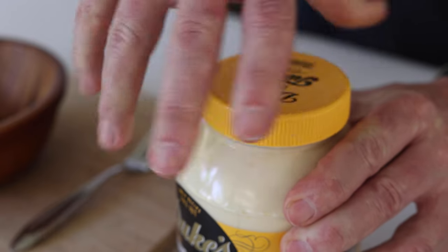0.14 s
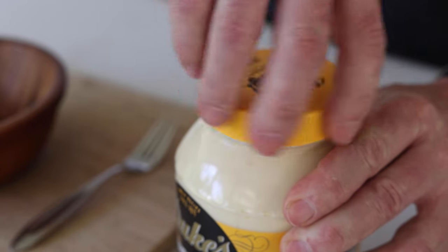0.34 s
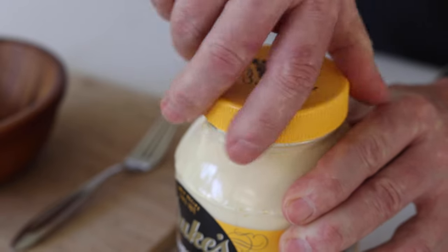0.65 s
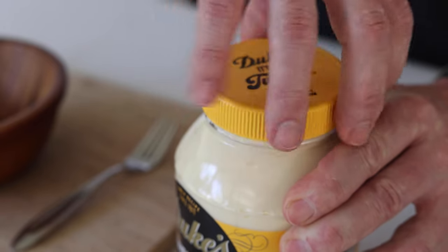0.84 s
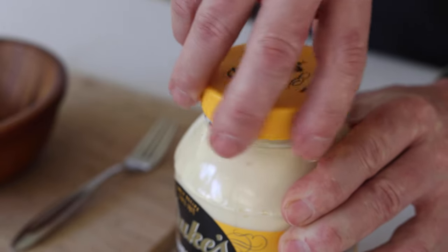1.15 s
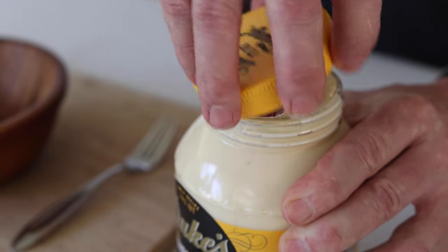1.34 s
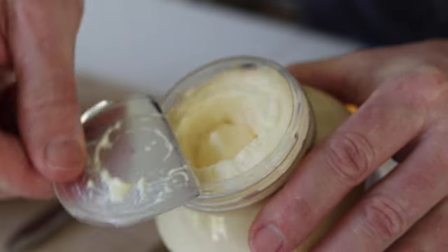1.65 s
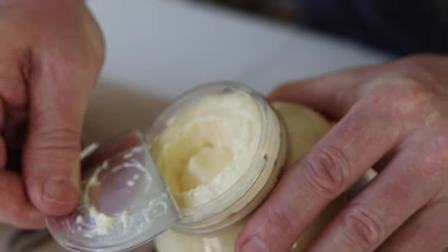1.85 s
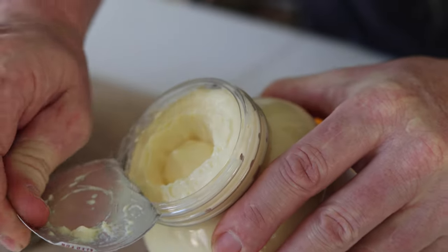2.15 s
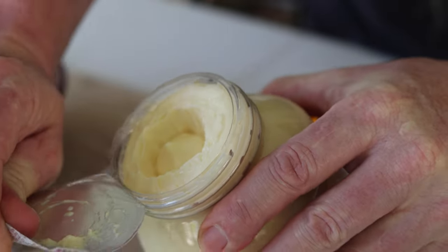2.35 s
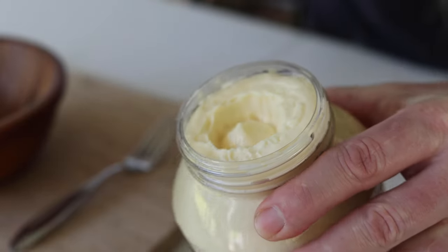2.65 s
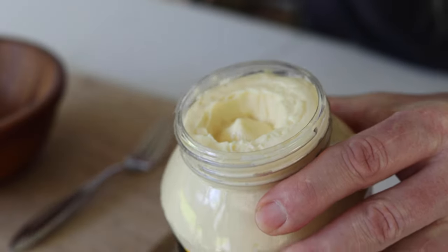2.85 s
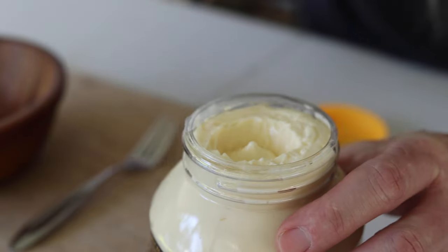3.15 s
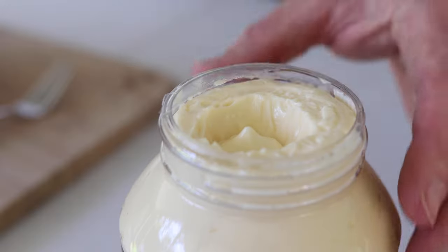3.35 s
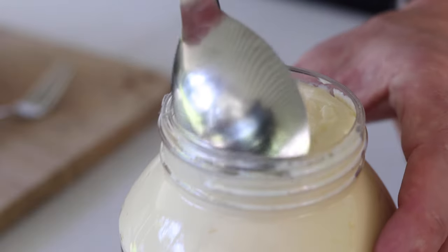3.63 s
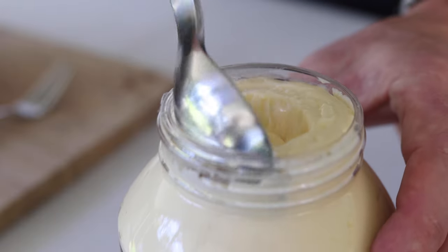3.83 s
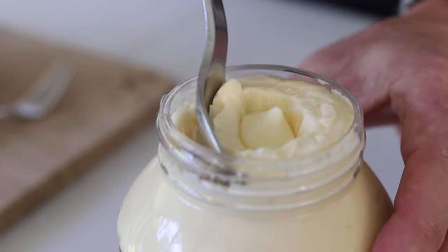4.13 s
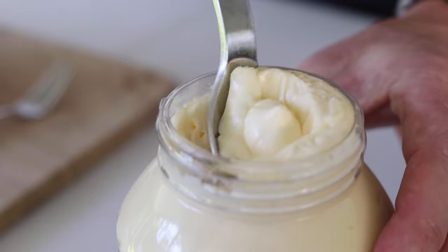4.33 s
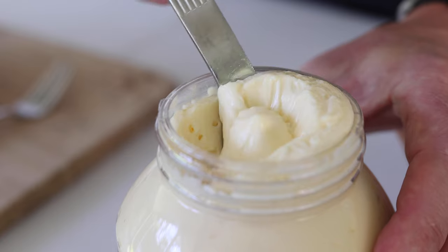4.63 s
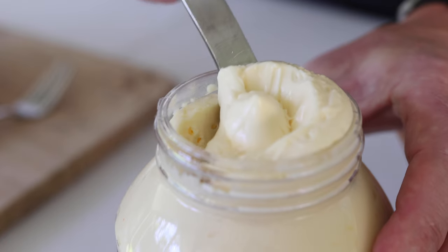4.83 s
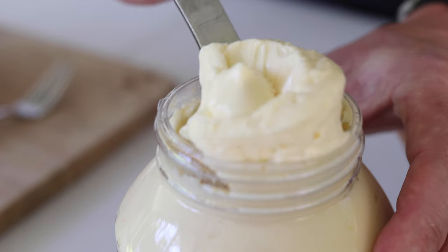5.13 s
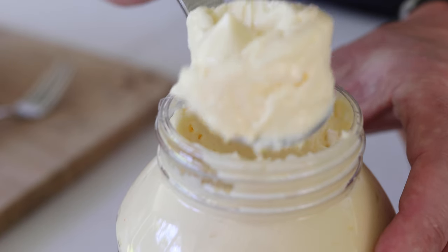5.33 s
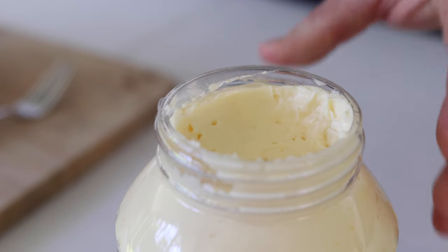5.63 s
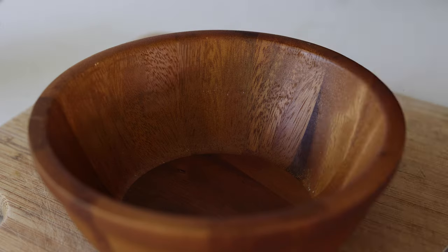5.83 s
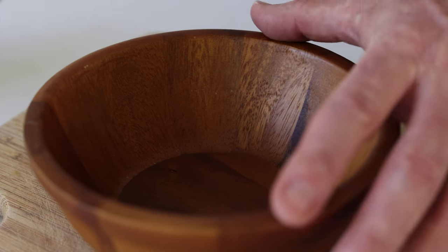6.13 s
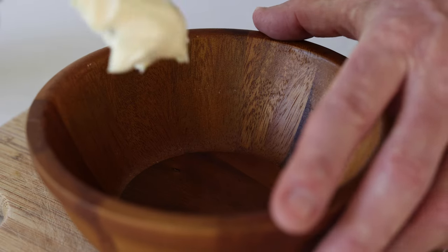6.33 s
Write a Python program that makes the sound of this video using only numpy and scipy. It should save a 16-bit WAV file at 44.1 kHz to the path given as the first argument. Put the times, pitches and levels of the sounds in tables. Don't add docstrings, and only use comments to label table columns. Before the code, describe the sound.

A close, nearly mono kitchen scene with a short room reverberation, low rumble, soft hiss and distant traffic hum. From 0.1 s a ribbed plastic lid turns in short bursts, hollow clicks and gritty rubs at about 0.1, 0.35, 0.87 and 1.34, with a rising cluster of cracks near 1.45 as it comes free. The background changes abruptly at 1.49. Foil glue crackles rapidly from 2.0 to 2.1, with a light sliding hiss, then a sharp pop at 2.47. The jar bumps wood softly at 1.95 and 2.2, firmly at 2.66, then lands with the loudest thud at 3.11, rattling until 3.2. Spoon taps come around 3.6, with three faint, thin bird chirps from 3.66 to 3.85. Bright steel squeaks and scrapes glide from 3.95 to 4.26. Scooping is quiet, with a small dull squeak at 4.88 and a tap at 5.15. Soft low bumps sound at 6.2 and 6.34.

```python
import sys
import numpy as np
from scipy import signal
from scipy.fft import rfft, irfft, next_fast_len
from scipy.io import wavfile
from scipy.ndimage import uniform_filter1d, map_coordinates

SR = 44100
rng = np.random.default_rng(int(sys.argv[2]) if len(sys.argv) > 2 else 0)


def volts_from_db(level):
    exponent = np.asarray(level, float) / 20
    return 10 ** exponent


def transcribe(u):
    v = np.clip(np.atleast_2d(u).T, -1, 1)
    q = np.round(v * 32767).astype(np.int16)
    wavfile.write(sys.argv[1], SR, q)


N = 285768
CUT_S, SINK_S = 1.487, 4.6


def unit(x):
    return x / np.sqrt(np.mean(x ** 2) + 1e-20)


def along(points, hz):
    f, v = np.transpose(points)
    return np.interp(np.log(hz + 1), np.log(f + 1), v)


def curves(table, s):
    at, *cols = np.transpose(table)
    return [np.interp(s, at, c) for c in cols]


def wobble(count, size=N):
    knots = rng.standard_normal(int(size * count / SR) + 4)
    return map_coordinates(knots, [np.arange(size) * count / SR])


def filtered(x, response):
    m = next_fast_len(N + SR // 2)
    return irfft(rfft(x, m) * response(np.fft.rfftfreq(m, 1 / SR)), m)[..., :N]


def resonant(x, peaks):
    def response(f):
        total = 0
        for k, (centre, width, db) in enumerate(peaks):
            damping = 1j * f * width
            total = total + (-1) ** k * volts_from_db(db) * damping / (centre * centre - f * f + damping)
        return total
    return filtered(x, response)


def dulled(x):
    return filtered(x, lambda hz: 1 / (1 + (hz / 12700) ** 30))


def add(track, s, sound):
    track[round(s * SR):][:len(sound)] += sound


def rush(spectrum, patchy_db):
    z = signal.stft(rng.standard_normal(N), nperseg=512)[2]
    field = uniform_filter1d(rng.standard_normal(z.shape), size=5, axis=0)
    field = uniform_filter1d(field, size=8, axis=1)
    patched = signal.istft(z * volts_from_db(patchy_db * unit(field)), nperseg=512)[1][:N]
    return unit(filtered(patched, lambda hz: volts_from_db(along(spectrum, hz))))


# f/Hz, level/dB [dB per Hz]
EARLY_RUMBLE = [(15, -65), (25, -35), (32, -37), (61, -5.5), (146, -2), (232, -15.5), (400, -12.5),
                (520, -29), (880, -120)]
RUMBLE = [(15, -33.5), (25, -20.5), (43, -4.5), (97, 0.5), (182, -3), (286, -12), (400, -9), (520, -58.5),
          (880, -120)]
DRONE = [(150, -35), (250, -6), (292, -13.5), (476, -5), (631, -8.5), (714, -3), (1040, -0.5), (1780, -8.5),
         (2460, -18.5), (3000, -20.5), (3900, -26), (6600, -120)]
HISS = [(1500, -120), (2200, -3.5), (4000, -4), (7000, -6.5), (9600, -6.5), (10000, -19), (13000, -18.5),
        (15800, -20)]
# f/Hz, level/dB [over the rumble]
EARLY_HUM = [(101, 1), (146, -1)]
# f/Hz, level/dB
WHINE = [(1050, -91), (1588, -73)]
# start t/s, rumble level/dB, drone change level/dB
SHOTS = [
    (0, -65, 2),
    (1.487, -68, -1.5),
    (2.5, -65, -1),
    (3.29, -67.5, -0.5),
    (5.87, -67, -6),
]
# t/s, drone level/dB
TRAFFIC = [(0, -63), (.8, -68), (1.8, -60), (3.4, -57.5), (4.3, -57.5), (4.7, -59), (5.0, -58.5),
           (5.8, -59), (6.48, -57.5)]


def air():
    t = np.arange(N) / SR

    def tone(hz, db, level_rate, phase_depth, phase_rate, sway_db):
        level = volts_from_db(db + sway_db * wobble(level_rate))
        return level * np.sin(2 * np.pi * hz * t + phase_depth * wobble(phase_rate))

    start_s, *shot_db = np.transpose(SHOTS)
    rumble_db, change_db = np.array(shot_db)[:, np.searchsorted(start_s[1:], t)]
    rumble_db = rumble_db + 0.8 * wobble(count=3)
    drone_db = change_db + curves(TRAFFIC, t)[0]
    early = rush(EARLY_RUMBLE, patchy_db=0.3) + sum(tone(hz, db, 6, 1, 9, 2.5) for hz, db in EARLY_HUM)
    rumble = volts_from_db(rumble_db + 2.5) * np.where(t < CUT_S, early, rush(RUMBLE, patchy_db=1.5))
    drone = volts_from_db(drone_db + 1.0) * rush(DRONE, patchy_db=1.5)
    hiss = volts_from_db(-71.0) * rush(HISS, patchy_db=0.9)
    whine = sum(tone(hz, db + 2.0, 15, 2.0, 12, 1.7) for hz, db in WHINE) * (t > 1.49) * (t < 2.47)
    electrical = volts_from_db(-85.5) * np.sin(2 * np.pi * 3040 * t)
    return rumble + drone + hiss + whine + electrical


# f/Hz, width/Hz, level/dB
RIM = [(2920, 840, -5.5), (4640, 1300, -0.5), (6650, 1960, 0.5), (7700, 2240, -0.5), (11400, 1800, -7)]
# f/Hz, width/Hz, level/dB
THREAD = [(600, 340, 1), (1114, 190, 0.5), (1567, 460, -7), (2115, 210, -9)]
# peak t/s, rise t/s, release t/s, hiss level/dB,
# grind level/dB
STROKES = [(.1, 0.58, 0.29, -54.5, -70), (0.105, 0.006, 0.024, -35, -36), (.354, 0.0088, 0.034, -75, -36),
           (0.411, 0.08, 0.3, -55.5, -47), (.708, 0.066, 0.087, -78, -68), (.85, 0.55, 0.056, -59, -52),
           (.862, 0.019, 0.033, -55, -48), (0.899, 0.033, 0.07, -45.5, -37), (1.33, 0.44, .02, -57, -55),
           (1.336, 0.011, 0.053, -44, -36.5), (1.449, 0.13, 0.031, -49, -45.5),
           (1.467, 0.03, 0.01, -61, -34), (1.99, 0.013, 0.028, -56, -45), (2.012, 0.02, 0.22, -39.5, -42),
           (2.188, 0.012, .06, -47.5, -61), (2.368, 0.059, 0.073, -56, -47.5),
           (2.462, 0.021, .003, -42, -40), (3.19, 0.4, 0.098, -47, -72), (3.512, 0.087, 0.25, -79.5, -63),
           (3.947, 0.083, .003, -44.5, -60), (5.646, 0.089, .046, -57, -64.5)]


def rub():
    t = np.arange(0, N, 8) / SR
    levels = np.zeros((2, len(t)))
    for s, rise, release, hiss_db, grind_db in STROKES:
        away = np.maximum((s - t) / rise, (t - s) / release)
        levels += np.outer(volts_from_db([hiss_db, grind_db]), volts_from_db(-30 * away))
    levels = np.repeat(levels, 8, axis=1)[:, :N]
    hiss, grind = np.roll(levels, SR // 250, axis=1)
    grains = rng.standard_normal((2, N)) * volts_from_db(3.5 * wobble(2500) + 3 * wobble(150))
    rim = unit(resonant(resonant(grains[0], RIM), [(6500, 12000, 0)]))
    hollow = unit(resonant(grains[1], THREAD))
    return volts_from_db(-12.5) * hiss * rim + volts_from_db(-8.0) * grind * hollow


# t/s, peak level/dB, ring f/Hz, crack level/dB [over ring]
TURNS = [(0.1033, -55, 895, 5), (0.109, -44.5, 1350, 14.5), (0.117, -57, 1100, 4), (0.1258, -38, 477, -23),
         (0.13, -42, 630, -23), (0.14, -44, 910, -15), (0.1445, -43, 930, -17), (0.154, -46, 600, -20),
         (0.165, -47, 895, -15), (0.174, -45, 600, -22), (0.327, -45, 780, -17), (0.332, -42, 540, -26),
         (0.3531, -25.5, 880, -13.5), (0.418, -46, 460, -6), (0.4407, -38, 620, -10),
         (0.694, -40, 426, -22), (0.709, -47, 487, -23), (0.842, -59, 400, 13.5), (0.8535, -56, 880, 3),
         (0.8602, -31.5, 1270, -26), (0.8607, -43, 1900, -28), (0.8672, -49, 1500, -22),
         (0.89, -51.5, 470, 5.5), (0.898, -38.5, 1640, -12), (0.901, -44, 1140, -8), (0.905, -39, 930, -11),
         (0.914, -49, 600, -25), (1.114, -52, 320, -25), (1.304, -38.5, 1030, -30),
         (1.336, -28.5, 1000, -7.5), (1.414, -44, 1410, -18), (1.4205, -45, 1320, -14),
         (1.437, -48, 1390, -12), (1.445, -44, 1840, 0.5), (1.449, -26, 1500, -19), (1.456, -40, 1590, -2),
         (1.4603, -34.5, 1670, -5.5), (1.4636, -33, 1760, -20), (1.467, -35, 2010, -8.5),
         (1.4745, -42, 2070, -23)]
# t/s, peak level/dB, ring f/Hz, crack level/dB [over
# ring], crack f/Hz
TAPS = [(1.626, -59, 894, 10, 4400), (2.4568, -53, 1540, 4, 6500), (2.461, -35, 834, -6.5, 3250),
        (2.4785, -35, 600, 0, 8300), (2.4835, -37, 560, -14, 3000), (2.4755, -38, 785, -1.5, 8600),
        (2.4945, -42, 600, -1, 8300), (3.554, -53, 1030, -4.5, 4080), (3.616, -59, 1170, 2.5, 3700),
        (3.653, -37.5, 460, -19, 3070), (3.669, -33.5, 383, -28, 3040), (4.6, -52, 830, -12, 3390),
        (5.1535, -44, 700, -16, 3060), (5.511, -56, 1700, -14, 3140),
        (3.909, -67, 1010, 8, 5530), (4.399, -60, 1000, 4, 8000), (4.941, -53, 1010, 9, 7300),
         (4.95, -52, 990, 1, 10300), (5.036, -46.5, 1070, -5.5, 3760), (6.188, -38.5, 335, -40, 3000),
         (6.213, -33.5, 410, -40, 3000), (6.2183, -34, 300, -35, 3000), (6.339, -40, 250, -39, 3000)]


def lid():
    ring, crack, t = np.zeros(N + SR), np.zeros(N + SR), np.arange(SR // 10) / SR
    free_s = 1.4
    contacts = TAPS
    for row in TURNS:
        threaded_hz = 6600 if row[3] > -10 else 3400
        contacts = contacts + [row + (4050 if row[0] > free_s else threaded_hz,)]
    for s, db, hz, crack_db, crack_hz in contacts:
        t60 = 0.013 * volts_from_db(-0.22 * (db + 40))
        soft = volts_from_db(-0.45 * crack_db)
        rise = 1 - np.exp(-t / (0.00017 * soft))
        pair = np.sin(2 * np.pi * hz * t) + 0.1 * np.sin(2 * np.pi * 1.83 * hz * t)
        grit = 0.75 / max(soft, 1) * rng.standard_normal(len(t))
        add(ring, s + 0.000885, -volts_from_db(db + 5.0 - 60 * t / t60) * rise * (pair + grit))
        loose = free_s < s < CUT_S
        snap = (0.4 if loose or s > SINK_S else 1) * rng.standard_normal(len(t))
        snap += 1.24 * np.sin(2 * np.pi * crack_hz * t)
        snap += 1.1 * loose * np.sin(2 * np.pi * 1.5 * crack_hz * t)
        add(crack, s + 0.00082, volts_from_db(db + crack_db + 8.0 - 60 * t / 0.0054) * snap)

    def cavity(hz):
        low_cut = 1j * hz / (1j * hz + 250)
        return low_cut / (1 + 1j * hz / 2600 - (hz / 2300) ** 2) ** 2

    crack = resonant(resonant(crack[:N], RIM), [(6470, 30000, 0)])
    return filtered(ring[:N], cavity) + np.where(np.arange(N) > SR // 5, dulled(crack), crack)


# f/Hz, t60 t/s
KITCHEN = [(100, 0.46), (600, 0.17), (3000, 0.27), (8000, 0.17), (15000, 0.13)]


def kitchen(x):
    hz, t, z = signal.stft(rng.standard_normal(SR // 2), SR, nperseg=256)
    tail = signal.istft(z * volts_from_db(-60 * t / along(KITCHEN, hz)[:, None]), SR, nperseg=256)[1]
    return signal.fftconvolve(np.pad(x, (180, 0)), tail / np.linalg.norm(tail))[:N]


# t/s, peak level/dB, edge level/dB
KNOCKS = [
    (1.949, -25, -22),
    (2.205, -30, -15.5),
    (2.663, -20.5, -20.5),
    (2.865, -35.5, -22),
]
# t/s, peak level/dB, edge level/dB, sign of first push [+1 or -1]
ROCKS = [
    (3.109, -11.5, -11.5, 1),
    (3.1367, -13.5, -14, -1),
    (3.1386, -19, -30, -1),
    (3.153, -23.5, -11, 1),
    (3.1675, -20, -17, -1),
    (3.179, -21.5, -16, 1),
    (3.198, -23.5, -26, 1),
]
# f/Hz, level/dB, t60 t/s
BOARD = [(74, 14.5, 0.17), (128, 22.5, 0.058), (216, 24.5, 0.022), (348, -30, 0.06), (475, 17, 0.054),
         (680, -32, 0.071)]
# delay t/s, signed gain [ratio]
BOUNCE = [(.0046, 0.072), (.0086, 0.29), (0.011, .3), (0.0199, 0.91)]
# f/Hz, width/Hz, level/dB
BASE = [(900, 480, 7), (1445, 350, 3), (3400, 700, -1.5), (5600, 1060, -3.5), (7400, 1360, -14.5)]


def jar():
    (track, base, thud), t = np.zeros((3, N + SR)), np.arange(SR // 3) / SR

    def bump(at, width):
        return np.exp(-0.5 * ((t - at) / width) ** 2)

    push = bump(0.003, 0.00052) - 1.05 * bump(0.00135, 0.00029)
    knocks = [k + (1, BOUNCE) for k in KNOCKS]
    rocks = [k + (BOUNCE[:-1],) for k in ROCKS]
    for s, db, edge_db, sign, returns in knocks + rocks:
        body = push.copy()
        for delay, gain in returns:
            body += gain * np.pad(push, (round(delay * SR), 0))[:len(t)]
        modes = 0
        for hz, mode_db, t60 in BOARD:
            decay = volts_from_db(mode_db + 2 * rng.standard_normal() - 60 * t / t60)
            modes = modes + decay * np.sin(2 * np.pi * hz * t)
        add(track, s, sign * volts_from_db(db - 4.5) * (body + 0.056 * modes * (1 - bump(0, 0.0028))))
        add(thud, s + 0.00102, volts_from_db(db + 2 - 60 * t / 0.13) * rng.standard_normal(len(t)))
        rattle = rng.standard_normal(len(t)) + 0.32 * np.sin(2 * np.pi * 3280 * t)
        add(base, s + 0.00097, volts_from_db(db + edge_db + 7.5 - 60 * t / 0.017) * rattle)
    thud = resonant(resonant(thud[:N], [(408, 484, 0)]), [(400, 500, 0)])
    base = dulled(resonant(resonant(base[:N], BASE), [(2200, 1850, 0.014)]))
    return track[:N] + thud + base


# t/s, peak level/dB, f/Hz, jar mouth level/dB
SNAPS = [(2.0, -45, 5230, -22), (2.008, -32.5, 5200, -20), (2.016, -33.5, 6940, -18),
         (2.035, -36, 5340, -12), (2.0435, -44, 5300, -14), (2.0554, -33.5, 4700, -14),
         (2.0112, -23.5, 5300, -12), (2.0213, -23, 5420, -13), (2.031, -31, 5200, -9),
         (2.04, -35, 5140, -9), (2.048, -30.5, 7950, -7), (2.0586, -37, 5830, -9),
         (2.0724, -37.5, 4400, -9), (2.0795, -35.5, 3560, -17), (2.0904, -46, 7700, -14),
         (2.188, -43, 5700, -21.5), (2.364, -49, 3200, -4)]
# f/Hz, width/Hz, level/dB
FOIL = [(1410, 260, 3.5), (3000, 240, 4), (5230, 1600, 0), (8000, 2500, -1.5), (11560, 2100, -3)]


def foil():
    track, t = np.zeros(N + SR), np.arange(SR // 20) / SR
    for s, db, hz, mouth_db in SNAPS:
        burst = np.sign(rng.standard_normal(len(t))) + 0.7 * np.sin(2 * np.pi * hz * t)
        mouth_hz = 1450 * (1 + 0.1 * rng.standard_normal())
        mouth = volts_from_db(min(mouth_db, -9) + 3 - 60 * t / 0.022) * np.sin(2 * np.pi * mouth_hz * t)
        add(track, s, volts_from_db(db - 2.5) * (volts_from_db(-60 * t / 0.015) * burst + mouth))
    return resonant(resonant(track[:N], FOIL), [(6500, 16000, 1)])


# f/Hz, level/dB, t60 t/s
POP = [(503, -18, .02), (700, 1, 0.012), (1390, -3, 0.01), (2670, -3.5, .006), (4440, -12, .004),
       (6650, 1, 0.0048), (8070, 2, .007), (7100, 7, 0.0047), (8600, -9, .008), (11200, -5, 0.0059),
       (12800, -8, 0.0037), (14500, -18, .005)]


def pop():
    track, t = np.zeros(N + SR), np.arange(SR // 20) / SR
    ring = sum(volts_from_db(db - 60 * t / t60) * np.sin(2 * np.pi * hz * t) for hz, db, t60 in POP)
    rise = 1 - np.exp(-t / 0.00057)
    add(track, 2.4686, -volts_from_db(-14) * rise * ring)
    return track[:N]


# t/s, level/dB
CHIRPS = [
    (3.66, -70.5),
    (3.73, -69.5),
    (3.818, -64.5),
]


def bird():
    long_s, start_hz, rise_hz = 0.042, 8000, 750
    track, t = np.zeros(N + SR), np.arange(round(long_s * SR)) / SR
    glide = np.sin(2 * np.pi * (start_hz + rise_hz * t / long_s / 2) * t)
    note = np.sin(np.pi * t / long_s) * glide
    for s, db in CHIRPS:
        add(track, s, volts_from_db(db + 3.8 * wobble(count=150, size=len(t))) * note)
    return track[:N]


# t/s, slip rate f/Hz, pressure level/dB, roughness [0-1]
NICK = [(3.9505, 5000, -41, 0.26), (3.9517, 4400, -34, .3), (3.9535, 3600, -46, 0.27)]
BITE = [(3.96, 4850, -45.5, .1), (3.962, 4520, -33.5, 0.14), (3.965, 3600, -31.5, .05),
        (3.966, 3330, -46, 0.3), (3.969, 2900, -29.5, .2)]
SKID = [(3.969, 4880, -26.5, .05), (3.971, 4640, -31, 0.059), (3.974, 4010, -35.5, 0.16),
        (3.979, 2760, -26.5, .3), (3.982, 2990, -31, 0.32), (3.985, 4020, -31, .12),
        (3.988, 4680, -37.5, .04), (3.99, 3970, -34.5, 0.17), (3.996, 2307, -23.5, 0.497)]
DRAG = [(3.998, 1587, -33, 0.5), (4.002, 1120, -30.5, .35), (4.008, 1192, -33, .4), (4.013, 1248, -34, .2),
        (4.017, 1360, -35, 0.3), (4.021, 1452, -35, .12), (4.028, 1515, -31, 0.13),
        (4.031, 1570, -33, 0.22)]
CLIMB = [(4.03, 2340, -28.5, .2), (4.037, 2960, -31.5, .12), (4.037, 3160, -34, .1),
         (4.0395, 3260, -30, .4), (4.0405, 4280, -34.5, .1), (4.045, 4580, -30, .06),
         (4.046, 4950, -34, .1), (4.049, 6000, -30, .2)]
STUTTER = [(4.05, 6070, -34, 0.26), (4.051, 6500, -43, .3), (4.054, 6800, -34.5, .2),
           (4.054, 6650, -53, .2), (4.0548, 6500, -27, .15), (4.056, 6160, -46, .3),
           (4.059, 6200, -35, 0.17), (4.061, 5750, -40, .1)]
HOLD = [(4.061, 5600, -45, .06), (4.066, 5990, -25.5, .04), (4.069, 6450, -33, .06),
        (4.072, 6360, -49, .15), (4.0745, 6500, -27, 0.083), (4.079, 6470, -48, 0.17),
        (4.085, 6500, -55, .3), (4.0875, 6300, -37, 0.22), (4.09, 6300, -54, .4)]
LEAN = [(4.091, 6340, -61, 0.35), (4.127, 6230, -48.5, .5), (4.141, 6200, -40.5, 0.92),
        (4.146, 6000, -38, 0.39), (4.146, 5980, -45.5, .4)]
SHOVE = [(4.148, 4090, -23.5, 0.41), (4.151, 4090, -34, 0.16), (4.155, 3700, -32, .1),
         (4.157, 3830, -31.5, 0.11), (4.161, 3580, -31, 0.074), (4.162, 3390, -21.5, .03),
         (4.166, 3190, -22, 0.034), (4.17, 3040, -21, 0.048), (4.172, 2940, -24.5, 0.14)]
STALL = [(4.172, 2936, -25.5, 0.16), (4.176, 2690, -28, .4), (4.179, 2084, -23.5, 0.85),
         (4.185, 1510, -29, 0.88), (4.191, 1057, -33.5, 0.43), (4.195, 774, -36, 0.64),
         (4.199, 680, -44.5, .7)]
TWIST = [(4.215, 805, -30, 0.33), (4.22, 1051, -30.5, 0.13), (4.223, 1133, -29.5, 0.17),
         (4.229, 1304, -24.5, 0.34)]
FLICK = [(4.229, 2040, -28, 0.33), (4.232, 2470, -27, 0.28), (4.236, 2756, -31.5, .1),
         (4.24, 3200, -24.5, .06), (4.243, 3400, -36.5, .2), (4.252, 3520, -36, 0.21),
         (4.26, 3440, -59, .5)]
SLIP = [(4.32, 3220, -52, 0.2), (4.326, 2560, -56, 0.25)]
SCOOP = [(4.869, 864, -50, .3), (4.871, 917, -40, 0.2), (4.879, 1340, -40.5, 0.22), (4.882, 1410, -46, 0.2),
         (4.884, 1390, -43, .2), (4.885, 1314, -36.5, 0.15), (4.889, 1301, -37.5, 0.1),
         (4.895, 1270, -38, 0.2), (4.9008, 1290, -41, .2)]
LIFT = [(4.9011, 1114, -38.5, 0.25), (4.91, 982, -37.5, 0.2), (4.9125, 1060, -39, .25),
        (4.915, 1050, -55, .5), (4.922, 1045, -64, 0.53), (4.94, 1034, -56, 0.62), (4.956, 1004, -54, .8)]
LOWEST_DB = [-28, -27, -7, 1, -3, 5, 3.5, 5.5, -15.5, -18, -4.5, 4, 2.5, -14, -10.5]
# f/Hz, level/dB [dB per Hz]
SPOON = [(470, -34.5), (800, -22.5), (1850, -15), (2200, -30.5), (3080, -14), (3860, -15.5), (4370, -6.5),
         (6040, -1), (7110, -8.5), (9590, -3), (10900, -20), (14100, -14), (14900, -26.5), (15400, -44.5)]
SUNK = [(350, -51), (600, -9), (1360, 0), (2360, -18), (2520, -16.5), (3410, -9), (4500, -4.5),
        (5300, -4.5), (6400, -9.5), (7300, -12), (8890, 0), (12400, -30), (15800, -36)]
# f/Hz, width/Hz, level/dB
BOWL = [(4540, 250, -13.5), (6220, 240, -7), (8000, 250, -7.5), (9900, 500, -13), (11900, 500, -22),
        (13880, 310, -9.5)]


def spoon():
    track = np.zeros(N + SR)

    def colour(spectrum, hz):
        return volts_from_db(6.5 + along(spectrum, hz))

    strokes = [NICK, BITE, SKID, DRAG, CLIMB, STUTTER, HOLD, LEAN, SHOVE, STALL, TWIST, FLICK, SLIP, SCOOP, LIFT]
    for stroke, lowest_db in zip(strokes, LOWEST_DB):
        s = stroke[0][0]
        n = round((stroke[-1][0] - s) * SR) + 44
        hz, db, rough = curves(stroke, s + np.arange(n) / SR)
        rough = np.clip(rough + 0.02, 0.04, 0.95)
        order = np.arange(1, 0.42 * SR / hz.min())[:, None]
        sway = 0.035 * np.sqrt(rough) * wobble(count=130, size=n)
        tremble = 0.014 * wobble(count=350, size=n) + 0.1 * rough * wobble(count=1200, size=n)
        rate = hz * (1 + sway + tremble)
        spread = 4 * rng.random(order.shape)
        flicker = 5.5 * np.sqrt(rough) * np.array([wobble(count=170, size=n) for _ in order])
        uneven = volts_from_db(flicker + lowest_db * (order == 1)) * (order * rate < 0.4 * SR)
        heard = uneven * colour(SUNK if s > SINK_S else SPOON, order * rate)
        phase = order * np.cumsum(2 * np.pi * rate / SR) + spread
        slips = np.sum(uneven * np.cos(phase), axis=0)
        slips = slips / np.sqrt(np.sum(heard ** 2, axis=0) / 2)
        slips = np.sqrt(1 - rough) * slips + np.sqrt(rough) * rng.standard_normal(n)
        to_end = np.minimum(np.arange(n), np.arange(n)[::-1])
        edges = np.sqrt(np.minimum(1, to_end / 44))
        add(track, s, volts_from_db(db - 1 + 1.3 * wobble(count=400, size=n)) * edges * slips)
    sunk = np.arange(N) > SINK_S * SR
    open_air, in_sauce = track[:N] * ~sunk, track[:N] * sunk
    bright = resonant(open_air, BOWL) + filtered(open_air, lambda hz: colour(SPOON, hz))
    return bright + filtered(in_sauce, lambda hz: colour(SUNK, hz))


def scene():
    near, knocks, squeaks = lid() + foil() + pop(), jar(), spoon()
    first = np.arange(N) < CUT_S * SR
    room = volts_from_db(-12.0) * (kitchen(near * first) * first + kitchen(near * ~first))
    knocks = knocks + volts_from_db(-11.5) * kitchen(knocks)
    knocks = filtered(knocks, lambda hz: 1 - 1 / (1 + (hz / 55) ** 8))
    knocks = knocks * np.clip((3.29 - np.arange(N) / SR) / 0.008, 0, 1)
    room = room + volts_from_db(-8.5) * kitchen(squeaks)
    mono = near + knocks + squeaks + room + rub() + air() + bird()
    return np.array([mono, mono])


def low_pass(x):
    return signal.sosfilt(signal.butter(12, 15850, fs=SR, output="sos"), x)


# f/Hz, level/dB
TRACE = [(60, -38), (250, -46), (1000, -35), (2400, -28.5), (5000, -37), (8500, -47), (13000, -38)]


def record(dry):
    def band(hz):
        low_cut = (hz ** 2 / (hz ** 2 - 58 ** 2 - 1.3j * hz * 58)) ** 2
        return low_cut * (hz < 16000)

    cut = filtered(dry, band)
    trace = filtered(cut[0] * wobble(count=40), lambda hz: volts_from_db(along(TRACE, hz)))
    hiss = resonant(resonant(rng.standard_normal(N), [(3500, 6100, 1)]), [(3500, 10000, 1)])
    trace = trace + volts_from_db(-73.0) * hiss
    drift = volts_from_db(-78.0) * np.array([wobble(count=70), wobble(count=70)])
    mix = cut + drift + trace * [[1], [-1]]
    return low_pass(mix)


dry = scene()
out = record(dry)
transcribe(out)
```